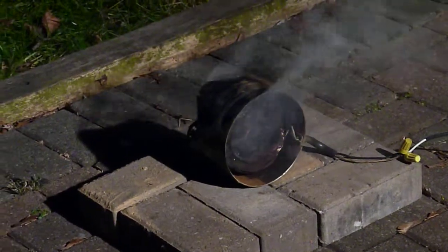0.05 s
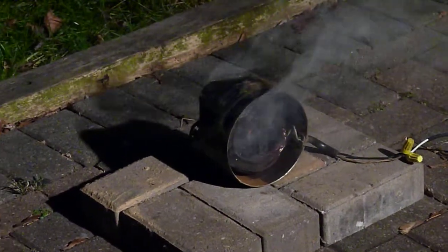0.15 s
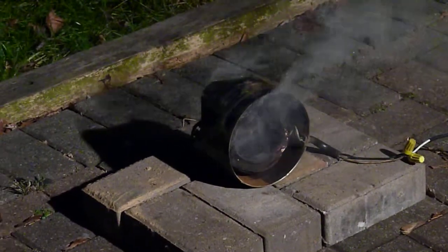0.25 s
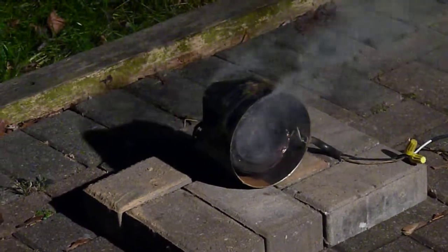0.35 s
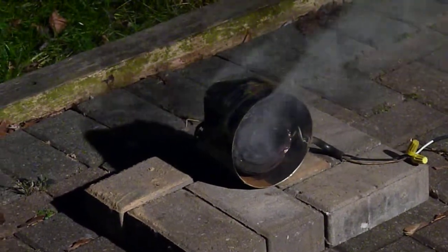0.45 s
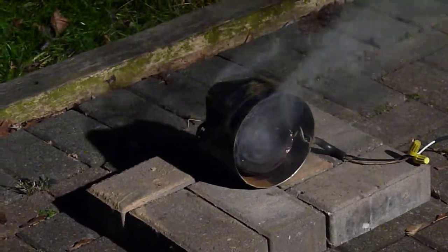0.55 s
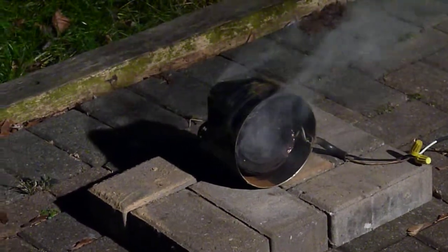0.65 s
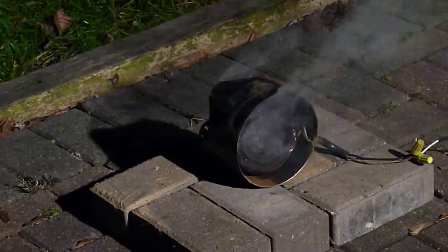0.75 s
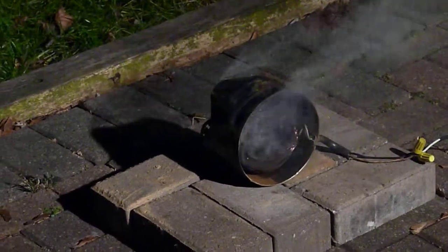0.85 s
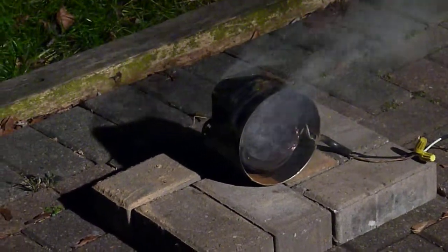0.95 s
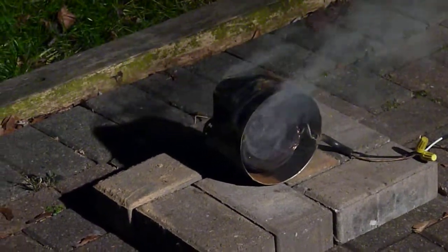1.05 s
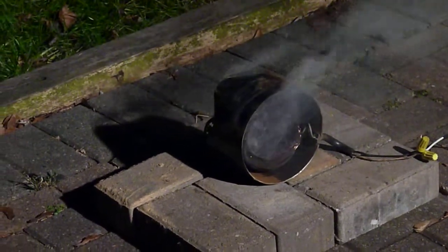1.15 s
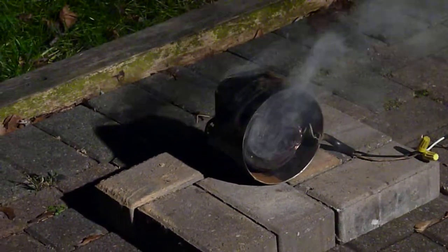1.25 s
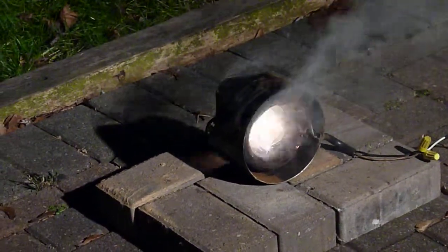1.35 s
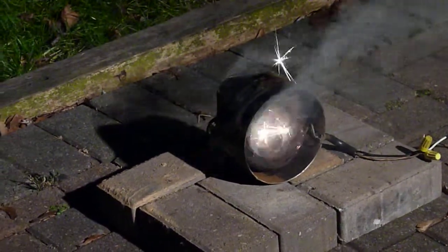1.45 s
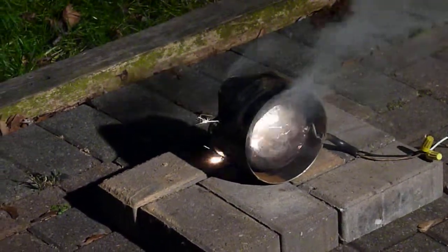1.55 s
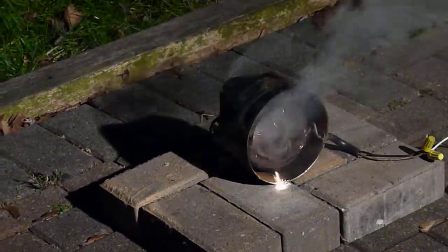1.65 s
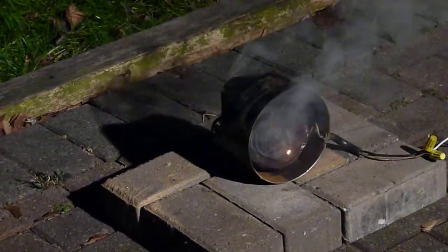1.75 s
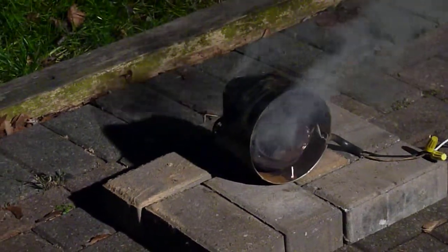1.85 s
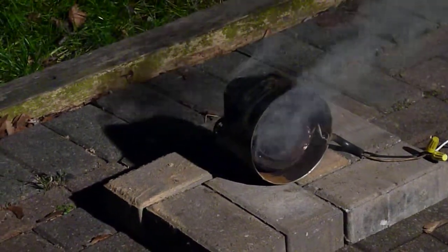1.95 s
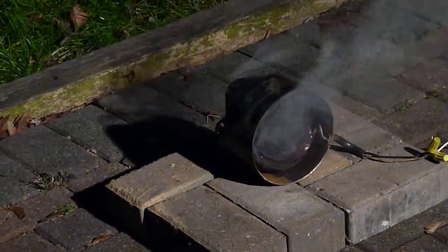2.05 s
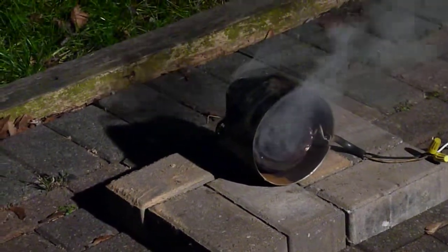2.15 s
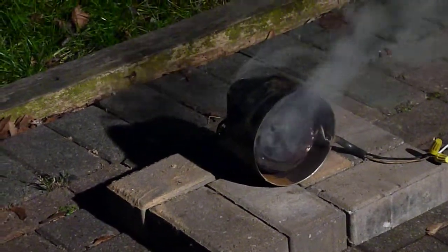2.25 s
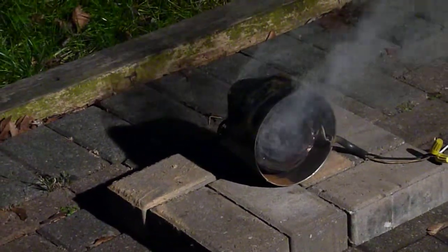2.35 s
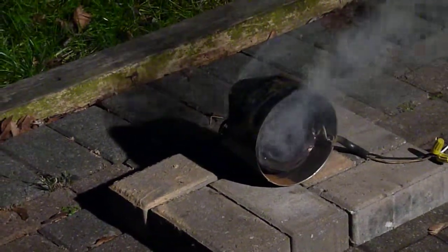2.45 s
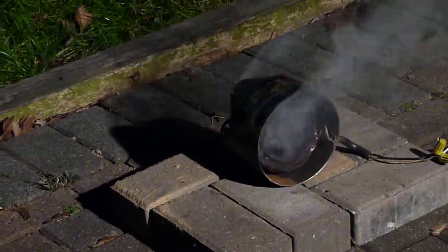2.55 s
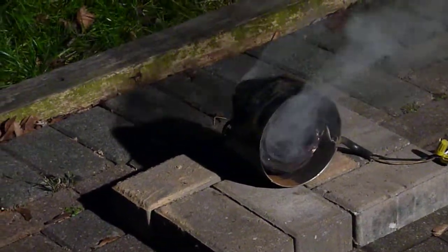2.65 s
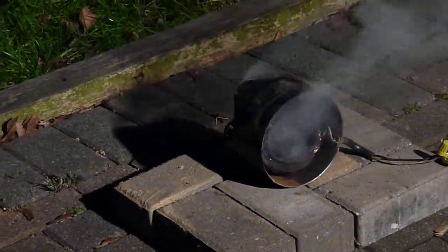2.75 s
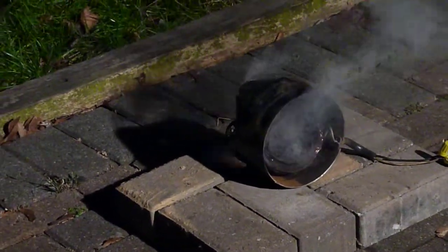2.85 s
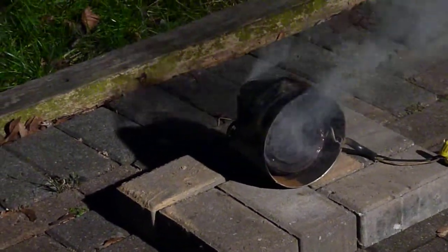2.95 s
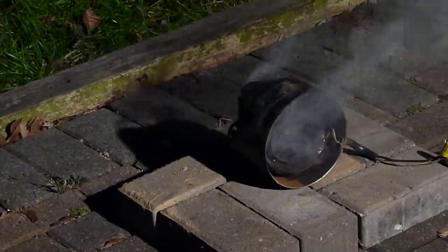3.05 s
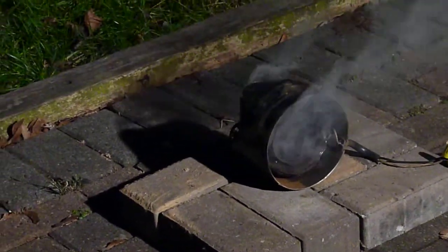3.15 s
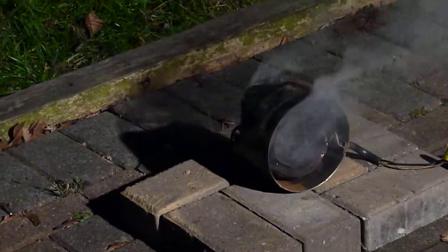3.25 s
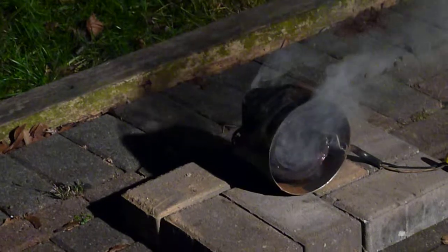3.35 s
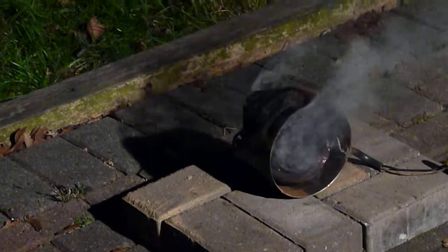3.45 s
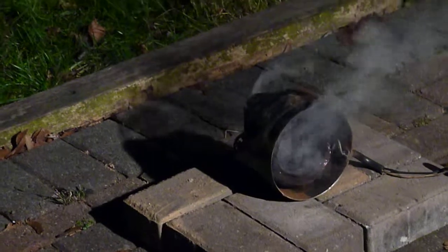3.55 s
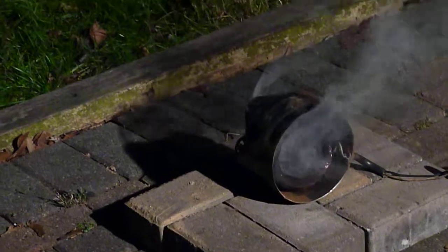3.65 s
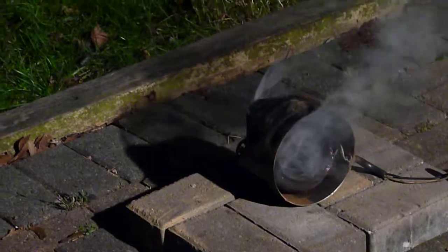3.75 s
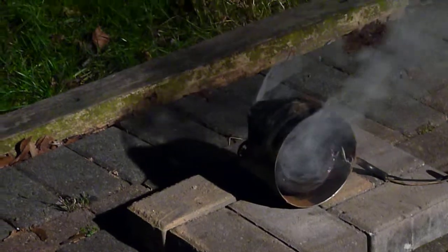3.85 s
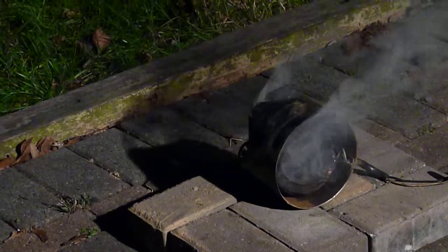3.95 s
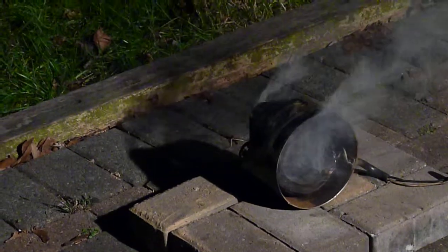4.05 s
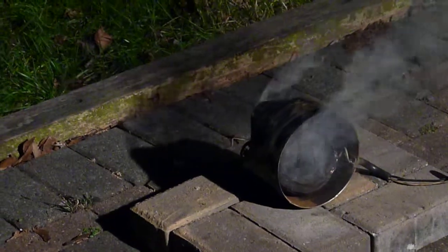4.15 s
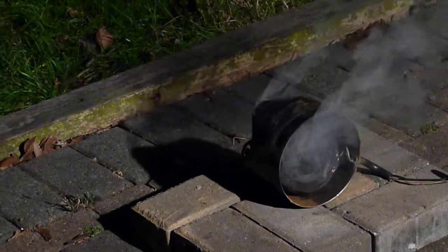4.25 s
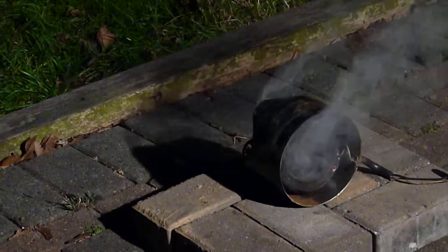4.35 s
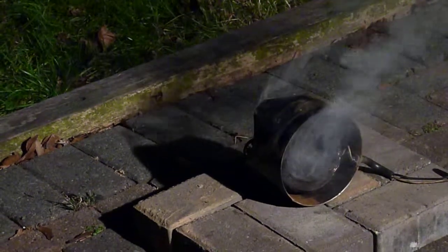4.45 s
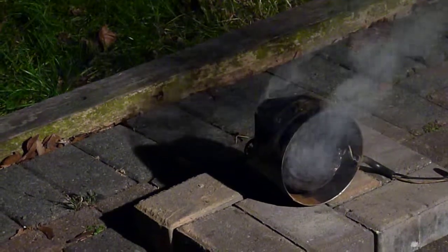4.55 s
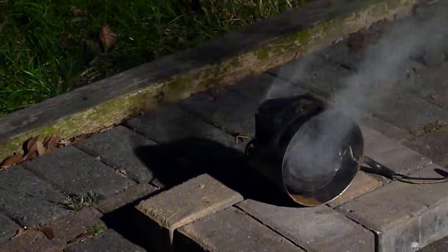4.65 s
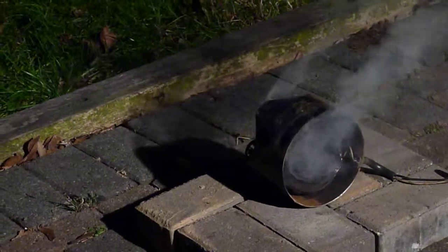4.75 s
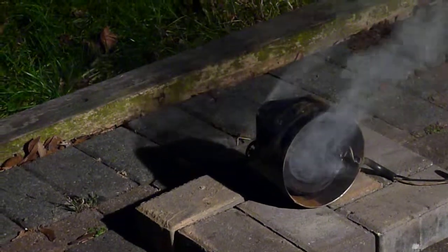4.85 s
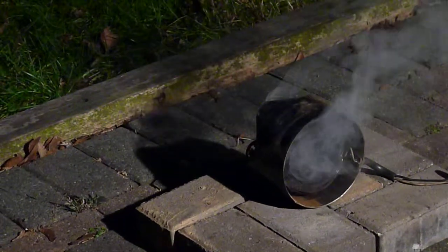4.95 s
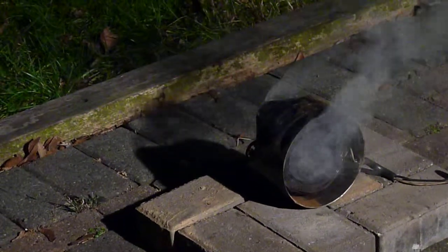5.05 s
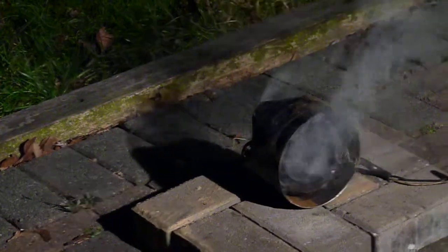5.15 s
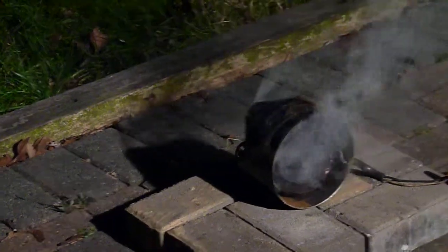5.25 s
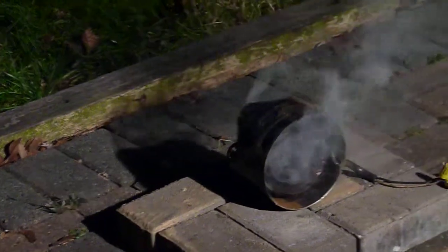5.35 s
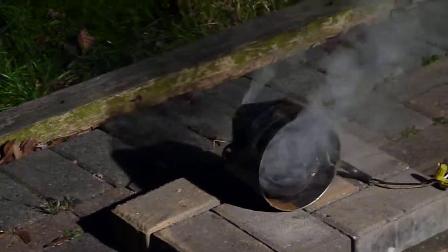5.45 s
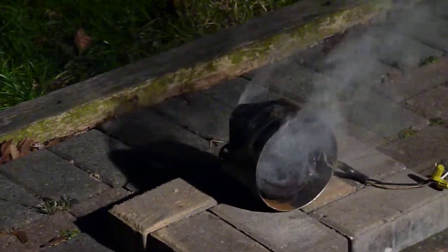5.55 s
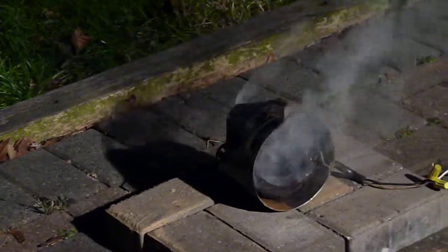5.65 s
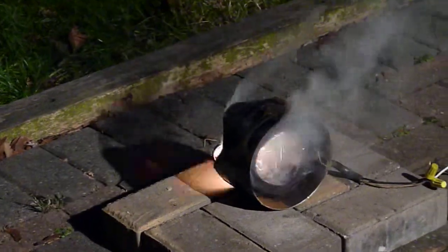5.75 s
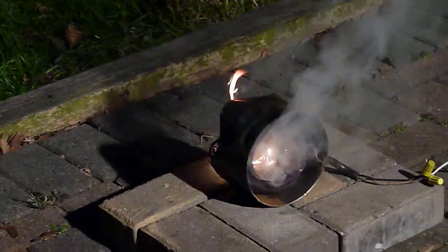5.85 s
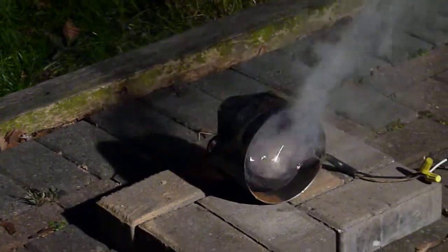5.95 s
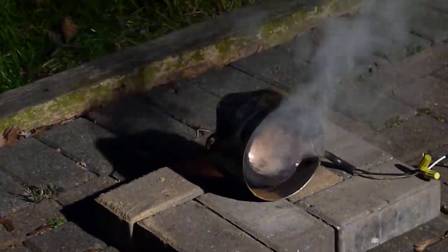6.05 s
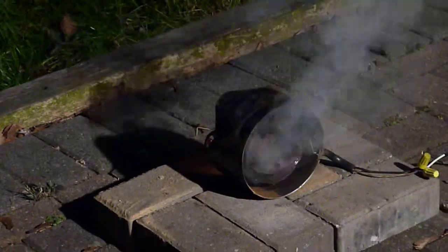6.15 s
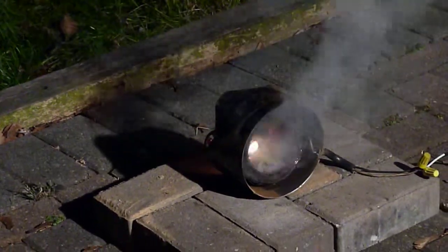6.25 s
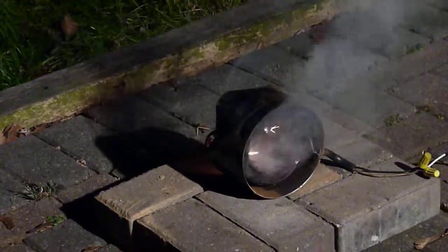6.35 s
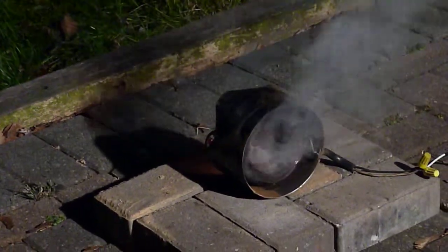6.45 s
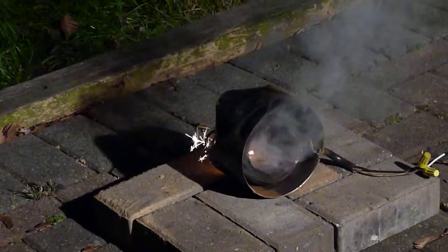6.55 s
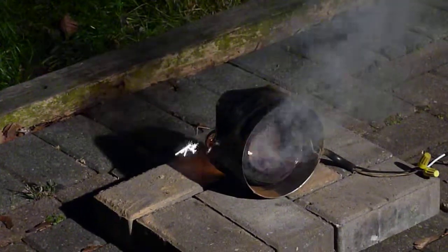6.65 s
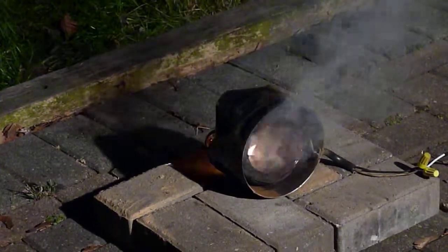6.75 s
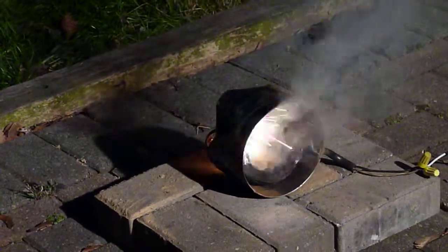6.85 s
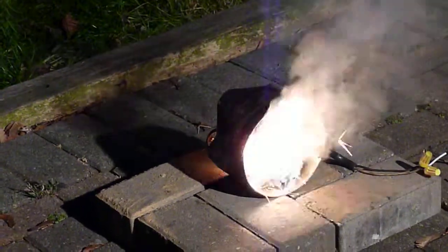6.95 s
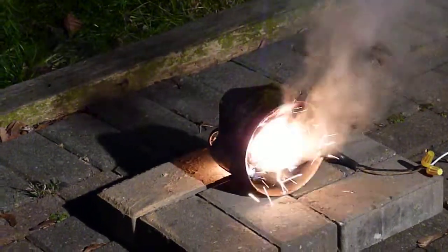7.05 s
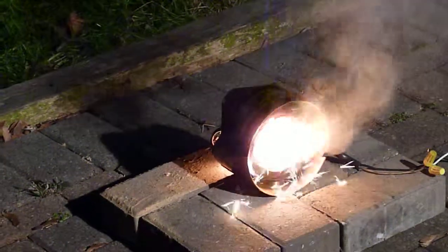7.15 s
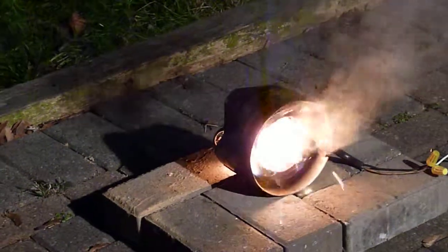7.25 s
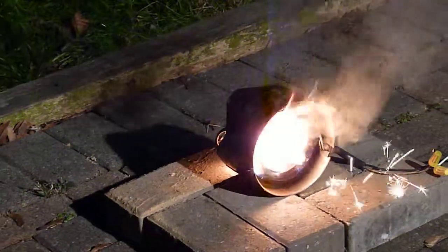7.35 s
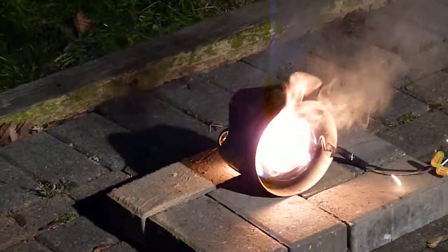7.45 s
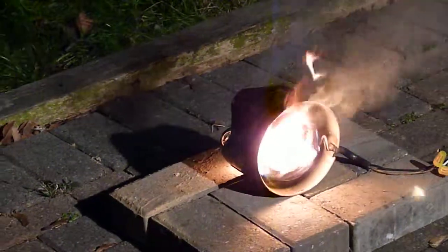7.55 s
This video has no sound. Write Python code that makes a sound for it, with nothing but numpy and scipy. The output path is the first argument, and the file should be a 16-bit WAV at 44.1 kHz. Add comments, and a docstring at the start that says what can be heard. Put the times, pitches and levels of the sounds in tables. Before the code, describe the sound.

A stalled electric motor buzzes steadily on outdoor paving, with a faint sizzle and small ticks. Sparks snap inside and make the buzz falter, and about three seconds in it stops. Scattered sharp snaps and faint pops follow, the loudest with a brief metallic ring. Near the end a short electrical crackle gives way to a soft sizzling flame and a thin buzz. Distant traffic washes underneath, with light microphone hiss.

```python
"""Over a wash of distant traffic, a stalled mains motor buzzes on paving outdoors: magnetic force jolts its
iron twice a cycle, while the overheating windings sizzle and their varnish boils. From 1 s, sparks snap
inside and shorts make the buzz sag; at 2.9 s a winding burns through and the buzz stops. More sparks
follow, the loudest with coloured echoes, among faint pops. At 6.9 s an arc crackles on the crests of the
mains, then leaves a sizzling flame and a thin buzz."""
import sys
import numpy as np
from scipy import signal
from scipy.fft import rfft, irfft
from scipy.io import wavfile
from scipy.ndimage import uniform_filter1d

SR = 44100
rng = np.random.default_rng(int(sys.argv[2]) if len(sys.argv) > 2 else 0)


def store_pcm(level_fs):
    """Save levels as 16-bit WAV."""
    pcm = np.round(np.clip(level_fs, -1, 1) * 32767).astype(np.int16)
    wavfile.write(sys.argv[1], SR, np.atleast_2d(pcm).T)


N = 335601
TIME = np.arange(N) / SR
MAINS_HZ, CREST_S = 60.015, 6.96  # mains frequency and the moment of one crest
SHORT_S, BURN_THROUGH_S, ARC_ON_S, ARC_OFF_S = 1.42, 2.904, 6.9, 7.012
SIZZLE_RELEASE_S = 0.05

# Spectrum of the distant traffic (frequency [Hz], relative level [dB])
TRAFFIC_SPECTRUM = [(25, -52), (60, -32.5), (100, -21), (200, -6.5), (340, -2), (490, -6.5), (800, 4),
                    (1200, -1.5), (1800, -8.5), (2250, -13.5), (2900, -22.5), (4200, -33.5), (6000, -66.5)]
# Likeness of the traffic at left and right (frequency [Hz], correlation [ratio])
TRAFFIC_COHERENCE = [(100, 1), (500, 0.99), (1000, 0.97), (2000, 0.75), (4000, 0.21), (8000, .3)]
# Swells of tyre hiss (centre [s], half length [s], gain [dB])
TYRE_PASSES = [(2.606, 2.33, 6), (5.52, 0.37, 3.5)]
# Course of the traffic's low rumble (time [s], gain [dB])
RUMBLE_CURVE = [(3.6, -1), (4.2, 2), (4.9, 0.5), (5.3, -2), (6.4, -3), (7.3, -1)]
# Harmonics of the warm frame (order [multiple of twice the mains], relative level [dB])
WARM_HARMONICS = [(1, -36.5), (2, -10), (3, -1), (4, -39), (5, 1), (6, 5), (7, -9), (8, 7), (9, -2),
                  (10, 5.5), (11, 0), (12, -7), (13, -8), (14, -33.5), (15, -13.5), (16, -26.5),
                  (17, -10.5), (18, -17), (19, -1.5), (20, -9.5)]
# Harmonics of the hot frame (order [multiple of twice the mains], relative level [dB])
HOT_HARMONICS = [(1, -30.5), (2, -9), (3, -4.5), (4, -12.5), (5, -8.5), (6, 1.5), (7, -1), (8, -13.5),
                 (9, -0.5), (10, 4), (11, 0.1), (12, -7), (13, -6.5), (14, -11), (15, -10.5), (16, -25.5),
                 (17, -14), (18, -7), (19, -4), (20, -8.5)]
# Thin top of the buzz, from loose laminations (frequency [Hz], relative level [dB])
LAMINATION_SPECTRUM = [(2520, -36.5), (2640, -14.5), (2760, -33), (2880, -20.5), (3000, -20), (3240, -35.5),
                       (3400, -23), (3700, -59.5), (3960, -27.5), (4400, -40), (4900, -25.5), (5600, -48),
                       (6000, -26), (7000, -64.5)]
# Two bands in which loose parts rattle (centre [Hz], width [Hz])
LOOSE_PART_BANDS = [(2350, 240), (3000, 600)]
# Course of the lower rattle band (time [s], gain [dB])
LOW_RATTLE_CURVE = [(0, -6), (.15, -9.5), (.3, -2), (.65, -4), (.8, 0), (1, -1.5), (1.1, -6), (1.25, -2),
                    (1.75, -9), (1.95, -12), (2.1, -22), (2.18, -0.5), (2.78, 0.5), (2.88, -7)]
# Course of the upper rattle band (time [s], gain [dB])
HIGH_RATTLE_CURVE = [(.24, -15), (.35, 1), (.5, 1.5), (1.001, -1.5), (1.24, 3), (1.5, -13), (2.1, -1),
                     (2.6, 1.5), (2.9, -2)]
# Sags of the current (start [s], end [s], mean treble gain [dB])
CURRENT_SAGS = [(1.03, 1.065, -30), (1.356, 1.44, -19), (1.576, 1.65, -5.5)]
# Spectrum of sizzling smoke and flame (frequency [Hz], relative level [dB])
SIZZLE_SPECTRUM = [(500, -23.5), (2800, -7), (3500, -2), (4200, -0.5), (5000, 1), (5800, -2), (7300, -0.5),
                   (9000, -29)]
# Loudest bursting blisters of varnish (time [s], level [dB], ring frequency [Hz])
BLISTERS = [(0.3366, -51, 4870), (0.395, -52.5, 5000), (1.2695, -50, 4950), (1.7852, -52, 5010),
            (1.9106, -56.5, 5200), (2.0783, -51, 4930), (2.1362, -54, 4960), (2.1525, -58, 4950),
            (2.2638, -51, 5200), (2.3218, -50, 4900), (2.412, -54, 5010), (2.494, -51, 4970),
            (2.5738, -49, 4910), (2.691, -52.5, 4810), (2.8018, -52, 4830), (2.8193, -51, 4820),
            (2.9792, -61, 4840), (3.043, -62, 5000), (3.0942, -50, 5100), (3.145, -49.5, 4940),
            (3.1705, -62, 4920), (3.2028, -58, 5050), (3.2438, -60, 4900), (3.4043, -54, 4920)]
# Spectrum of boiling varnish (frequency [Hz], relative level [dB])
VARNISH_SPECTRUM = [(500, -24), (3300, -22.5), (4300, 1), (5000, 4.5), (5450, -0.5), (5950, -14),
                    (9000, -34)]
# Sparks (time [s], level [dB], length [s], treble tilt [dB/octave], pop re crack [dB],
# ring frequency [Hz], ring re crack [dB])
FLASHOVERS = [(1.046, -52, 0.0048, -2, -10, 7000, -14), (1.349, -42.5, 0.0049, -4, -16, 4800, -8),
              (1.389, -55, 0.0019, 3, 7, 5000, -5), (1.4, -38.5, 0.0041, -3.5, 2, 5000, -8),
              (1.593, -46, .005, -6, -17, 4300, -4), (1.5994, -30, 0.0042, 3.5, -2, 4070, -10),
              (2.899, -43, 0.0054, 8, 4, 5700, -4), (3.901, -55, 0.0027, -5, -4, 3530, -10),
              (4.0979, -31, 0.0018, -10.5, -10, 4820, 2), (4.295, -48.5, 0.0023, -4, -1, 3920, -11.5),
              (4.586, -61, .003, -1, -13, 5900, -9), (5.127, -58.5, .002, -4, -18, 4000, -7),
              (5.29, -60, .002, -5, -16, 5000, -4), (5.616, -54.5, 0.0067, 6, 1, 3360, -6),
              (5.625, -54.5, 0.01, -5, -10, 5600, -8), (5.646, -59, .007, 1, -12, 5600, -9),
              (5.726, -59, 0.0025, 2, -14, 5650, -4), (5.743, -59, .003, -3, -12, 5000, -6),
              (5.7838, -36, 0.0044, -2, 3.5, 4840, -2), (5.832, -38.5, 0.0035, 3.5, -0.5, 5640, -8),
              (5.868, -41, 0.0023, -3, -2, 6260, -9), (6.011, -53.5, 0.0015, 4, -19, 4070, -1),
              (6.184, -44, 0.0022, 1, 3, 7200, -12), (6.379, -42.5, 0.0061, 0, -21, 5700, -11),
              (6.531, -58, 0.0018, 7, 2, 6900, 3), (6.587, -57, .003, -5, -16, 5700, -12),
              (6.599, -44.5, 0.0041, -1, -16, 6830, -11), (6.737, -57, 0.0024, -6, -14, 6400, -6),
              (6.76, -63, .002, 10, -18, 7300, -6), (6.909, -38.5, 0.0022, -12, -22, 2050, 3),
              (7.145, -55, 0.0034, 1, -15, 6600, -8), (7.359, -55, 0.0027, 1, -15, 7000, -8),
              (7.177, -52, 0.0036, -6, -11, 6930, -8), (7.2295, -55, 0.0027, -6, -14, 3150, -6),
              (7.282, -53.5, 0.0024, -7, -13, 3430, -2), (7.408, -56, .003, 0, -14, 3550, -11)]
# Spectrum of a spark's crack (frequency [Hz], relative level [dB])
CRACK_SPECTRUM = [(100, -40.5), (900, -26.5), (2000, 3.5), (3000, 3.5), (3600, 1.5), (4150, 8.5),
                  (5000, 11), (6150, 6), (6550, 4.5), (7000, 10), (7600, 3), (9000, -19.5)]
# Spectrum of a spark's low pop (frequency [Hz], relative level [dB])
POP_SPECTRUM = [(40, -38.5), (100, -22), (300, 0.5), (550, -4), (800, 6), (1080, 10), (1330, 2),
                (1700, -4.5), (2400, 4.5), (5000, -50)]
# Spectrum of the fizz after a spark (frequency [Hz], relative level [dB])
SPUTTER_SPECTRUM = [(900, -25.5), (2000, -3), (2900, 9.5), (3500, 4.5), (4200, 7), (5000, -1), (5800, 2.5),
                    (7000, 2.5), (7600, -1), (9000, -27.5)]
# Pitches of the tiniest random pings (frequency [Hz])
TINY_PING_HZ = [4800, 5600, 5680]
# Short pitched rings: coloured echoes just after the loud sparks, plus a few faint separate pops
# (time [s], level [dB], ring frequency [Hz])
PITCHED_RINGS = [(4.097, -45, 3140), (4.1065, -46, 3680), (4.117, -48, 5000), (4.123, -51, 3830),
                 (4.487, -65, 5580), (4.728, -65, 5600), (5.4605, -59, 5560), (5.793, -44, 3440),
                 (5.809, -47, 5000), (5.8105, -47, 3650), (5.85, -53, 3500), (5.876, -51, 3480),
                 (5.893, -55, 3750), (6.127, -63, 5600), (6.209, -61, 5800), (6.3702, -55, 5600),
                 (6.4288, -59, 5540), (6.5845, -58, 5500), (6.624, -55, 5100)]
# Spectrum of the arc's crackle (frequency [Hz], relative level [dB])
ARC_SPECTRUM = [(200, -30), (1400, -8), (2050, 11), (2450, 9), (2900, 9), (3400, 7.5), (4100, 6.5),
                (4600, -1), (5400, 5.5), (7200, 2), (9000, -24)]
# Spectrum of the arc's puff of gas (frequency [Hz], relative level [dB])
PUFF_SPECTRUM = [(50, -49), (150, -15), (270, 10), (500, 0), (1000, 4), (1500, -19), (2200, -26),
                 (4000, -35)]
# Buzz of the current through the flame (frequency [Hz], relative level [dB])
FLAME_BUZZ_SPECTRUM = [(120, -30.5), (240, 1.5), (360, 3.5), (480, -1), (620, -0.5), (1100, -14.5),
                       (1450, -10), (2200, -3.5), (2800, -11.5), (4000, -21), (6000, -21), (9000, -42)]
# Reflections off the kerb and walls (delay [s], gain [dB])
REFLECTIONS = [(0.0113, -17), (0.018, -23), (.0262, -14)]
# Self-noise of the microphone (frequency [Hz], relative level [dB])
MIC_HISS_SPECTRUM = [(100, -28), (2000, 4.5), (3500, 9), (5000, 7.5), (7300, 6.5), (9000, -20)]
# Balance of the microphone's two ports (frequency [Hz], left minus right [dB])
PORT_BALANCE = [(350, 0), (1000, -1.3), (1700, -2.5), (2900, -1.5), (5000, -3), (8400, -6)]
# Phase between the ports (frequency [Hz], lead of the left [rad])
PORT_LEAD = [(1200, 0), (2100, 0.19), (3200, 0.87), (4100, 0.54), (5500, 0.39), (6200, -1.2), (7500, 1),
             (8800, 0.57)]
# Notches in the microphone's response (centre [Hz], width [Hz])
MIC_NOTCHES = [(2600, 850), (4600, 830), (5430, 220), (7900, 66), (8080, 92)]


def gain_of(db):
    """Amplitude ratio of a level in decibels."""
    return 10 ** (np.asarray(db) / 20)


def unit_rms(x):
    """Normalisation to rms 1."""
    return x / np.sqrt(np.mean(x ** 2) + 1e-20)


def curve_at(points, hz):
    """Linear interpolation in log frequency."""
    f, value = np.transpose(points)
    return np.interp(np.log(hz + 1), np.log(f + 1), value)


def add(mix, s, sound):
    """Superposition of a sound on the mix, from time s."""
    part = mix[round(s * SR):][:len(sound)]
    part += sound[:len(part)]


def since(s):
    """Seconds elapsed since time s; zero before it."""
    return np.maximum(TIME - s, 0)


def swell(s, length_s):
    """Linear rise from 0 to 1, from time s."""
    return np.minimum(since(s) / length_s, 1)


def release(s, decay_s):
    """Exponential decay from time s; 1 before it."""
    return np.exp(-since(s) / decay_s)


def colour(x, spectrum, tilt_db=0, size=4096):
    """Minimum-phase filtering by a response of unit energy, tilted per octave from 3 to 9 kHz."""
    hz = abs(np.fft.fftfreq(size, 1 / SR))
    octaves = np.log2(np.clip(hz, 3000, 9000) / 3000)
    log_gain = np.log(gain_of(curve_at(spectrum, hz) + tilt_db * octaves))
    response = np.fft.ifft(np.exp(np.conj(signal.hilbert(log_gain)))).real[:size // 2]
    return signal.fftconvolve(x, response / np.linalg.norm(response))[:N]


def treble(x, hz):
    """Zero-phase high-pass filtering."""
    f = np.fft.rfftfreq(N, 1 / SR)
    return irfft(rfft(x) * (1 - 1 / (1 + (f / hz) ** 8)), N)


def band(x, hz, width_hz):
    """Zero-phase band-pass filtering."""
    f = np.fft.rfftfreq(N, 1 / SR)
    return irfft(rfft(x) / (1 + (2 * (f - hz) / width_hz) ** 8), N)


def traffic(level_db=-45.5, drone_hz=150.4, drone_db=-69.5):
    """Far traffic sums to partly coherent noise, with swells of tyre hiss and a narrow-band drone."""
    hz = np.fft.rfftfreq(N, 1 / SR)
    left, independent, drone = rfft(rng.standard_normal((3, N)))
    coherence = curve_at(TRAFFIC_COHERENCE, hz)
    right = coherence * left + np.sqrt(1 - coherence ** 2) * independent
    roar = unit_rms(irfft(np.array([left, right]) * gain_of(curve_at(TRAFFIC_SPECTRUM, hz)), N))
    tyres_db = -2 + sum(db * np.exp(-((TIME - s) / half_s) ** 2) for s, half_s, db in TYRE_PASSES)
    roar += (gain_of(tyres_db) - 1) * treble(roar, 1450)
    rumble_db = np.interp(TIME, *np.transpose(RUMBLE_CURVE))
    roar += (gain_of(rumble_db) - 1) * band(roar, 240, 160)
    drone = unit_rms(irfft(drone / (1 + ((hz - drone_hz) / 5) ** 2), N))
    swell_db = 1.4 * np.exp(-((TIME - 4.96) / 0.16) ** 2)
    return gain_of(level_db + swell_db) * roar + gain_of(drone_db) * drone


def strain_s():
    """Strain accumulates in the windings with time: anew when turns short, no further once one breaks."""
    return np.minimum(TIME, BURN_THROUGH_S) - SHORT_S * (TIME > SHORT_S)


def magnetic_jolts(lag_turns, jitter_db):
    """Magnetic force peaks in every half cycle of the mains: a slightly uneven pulse train."""
    turns = 2 * MAINS_HZ * (TIME - CREST_S) - lag_turns
    nearest = np.round(turns).astype(int)
    strength = gain_of(jitter_db * rng.standard_normal(np.ptp(nearest) + 1))[nearest - nearest[0]]
    samples_away = (turns - nearest) * SR / (2 * MAINS_HZ)
    return unit_rms(strength * np.sinc(samples_away / 2) * np.exp(-(samples_away / 16) ** 2))


def dispersion(x, treble_lead_s=0.0008, above_hz=1850):
    """Bending waves in the steel frame run faster at high frequency, so the treble arrives first."""
    hz = np.fft.rfftfreq(N, 1 / SR)
    lead_s = treble_lead_s * (1 - 1 / (1 + (hz / above_hz) ** 12))
    return irfft(rfft(x) * np.exp(2j * np.pi * np.cumsum(lead_s) * SR / N), N)


def current_sags(x, onset_s=0.0042, recovery_s=0.005, flutter_depth=0.42, bass_share=0.43):
    """Amplitude modulation: shorts make the buzz sag and flutter, the treble more than the bass."""
    sag_db = np.zeros(N)
    for start, end, db in CURRENT_SAGS:
        ramp = np.minimum((TIME - start) / onset_s, (end - TIME) / recovery_s)
        sag_db += db * np.clip(ramp + 0.5, 0, 1)
    flutter = unit_rms(uniform_filter1d(rng.standard_normal(N), size=370))
    sag_db *= 1 + flutter_depth * flutter
    rasp = treble(x, 970)
    return gain_of(sag_db) * rasp + gain_of(bass_share * sag_db) * (x - rasp)


def motor_buzz():
    """Forced vibration: magnetic jolts ring the frame and rattle loose parts until a winding breaks."""
    heat = 1 - 0.55 * release(SHORT_S, decay_s=0.13)
    drive_db = -42.5 + 0.95 * strain_s() - 1.6 * heat  # the hot frame buzzes more softly
    jolts = magnetic_jolts(lag_turns=0.47, jitter_db=0.35) * gain_of(drive_db) * (TIME < BURN_THROUGH_S)
    warm, hot = (colour(jolts, [(2 * MAINS_HZ * k, db) for k, db in harmonics] + LAMINATION_SPECTRUM)
                 for harmonics in (WARM_HARMONICS, HOT_HARMONICS))
    frame = (1 - heat) * warm + heat * hot
    rattle_db = -4 + 4.5 * strain_s()
    frame += (gain_of(rattle_db) - 1) * treble(frame, 3100)
    for (hz, width_hz), curve in zip(LOOSE_PART_BANDS, (LOW_RATTLE_CURVE, HIGH_RATTLE_CURVE)):
        band_db = np.interp(TIME, *np.transpose(curve))
        frame += (gain_of(band_db) - 1) * band(frame, hz, width_hz)
    return current_sags(dispersion(frame))


def grains(per_s, spread_db, size=N):
    """Shot noise of rms 1: tiny clicks at random moments, a few of them large."""
    strength = gain_of(spread_db * np.minimum(rng.exponential(1, size), 4))
    return unit_rms((rng.random(size) < per_s / SR) * strength * rng.choice([-1, 1], size))


def mains_gate(width, between_db, reverse_db=0):
    """Discharge peaks at each voltage crest and falls by 1/e per `width`, a share of the crest."""
    voltage = np.cos(2 * np.pi * MAINS_HZ * (TIME - CREST_S))
    crest = np.exp((abs(voltage) - 1) / width)
    return unit_rms(crest * np.where(voltage > 0, 1, gain_of(reverse_db)) + gain_of(between_db))


def surge_db():
    """Boiling grows exponentially up to the burn-through, then dies away."""
    return 5.5 * np.exp(-abs(TIME - BURN_THROUGH_S) / 0.13) * release(BURN_THROUGH_S, SIZZLE_RELEASE_S)


def sizzle(smoulder_db=-77, flame_db=-67, flare_db=-53.5):
    """Mains-modulated noise of smoke and tiny discharges: under current, smouldering, then aflame."""
    live = gain_of(-69 + 2 * strain_s() + surge_db()) * release(BURN_THROUGH_S, SIZZLE_RELEASE_S)
    flare = gain_of(flare_db) * release(ARC_OFF_S, decay_s=0.03)
    flame = (TIME > ARC_OFF_S) * (gain_of(flame_db) + flare)
    envelope = np.maximum(live + flame, gain_of(smoulder_db))
    fizz = unit_rms(rng.standard_normal(N) + grains(per_s=540, spread_db=2))
    return colour(fizz * mains_gate(width=0.17, between_db=-4.5) * envelope, SIZZLE_SPECTRUM)


def burst(length_s, spectrum, tilt_db=0, shock_s=0.0005, size=600):
    """Sudden expansion: a shock and a dying rush of gas, with the energy of rms 1 over length_s."""
    age = 4 * np.arange(size) / SR / length_s
    gas = rng.standard_normal(size) * age * np.exp(-age ** 1.03 / 1.58)
    shock = 0.45 * signal.unit_impulse(size, round(shock_s * SR))
    snap = colour(gas / np.linalg.norm(gas) + shock, spectrum, tilt_db)
    return snap / np.linalg.norm(snap) * np.sqrt(length_s * SR)


def ping(hz, decay_s, size=1200):
    """Damped resonance: a brief metallic ring of unit energy."""
    t = np.arange(size) / SR
    ring = t * np.exp(-t / decay_s) * np.sin(2 * np.pi * hz * t)
    return ring / np.linalg.norm(ring)


def boiling_varnish(tick_s=0.002, gas_db=-4, start_db=-74, rest_db=-81.5):
    """Bursting blisters excite pitched ticks, over a simmer of shot noise that follows the heat."""
    heating_db = 3 * np.minimum(TIME, BURN_THROUGH_S) - 26 * since(BURN_THROUGH_S)
    simmer_db = np.maximum(start_db + heating_db + surge_db(), rest_db)
    out = colour(grains(per_s=160, spread_db=2) * gain_of(simmer_db), VARNISH_SPECTRUM)
    for s, db, hz in BLISTERS:
        add(out, s, gain_of(db + gas_db) * burst(tick_s, VARNISH_SPECTRUM))
        add(out, s, gain_of(db) * np.sqrt(tick_s * SR) * ping(hz, decay_s=0.00049))
    return out


def sparks(leak_s=0.0059, sputter_s=0.068, pop_delay_s=0.0008, size=5000):
    """Electrical breakdown: leakage fizzes up to a crack that rings the housing, pops and sputters."""
    out = np.zeros(N)
    t = np.arange(size) / SR
    for s, db, length_s, tilt_db, pop_db, ring_hz, ring_db in FLASHOVERS:
        leak = np.exp(-t / leak_s)[::-1] * grains(per_s=2500, spread_db=2.2, size=size)
        sputter = np.exp(-t / sputter_s) * grains(per_s=840, spread_db=1.6, size=size)
        impulse = np.sqrt(length_s * SR)  # carries the same energy as the burst
        add(out, s - size / SR, gain_of(db - 21) * colour(leak, CRACK_SPECTRUM, tilt_db))
        add(out, s, gain_of(db) * burst(length_s, CRACK_SPECTRUM, tilt_db))
        add(out, s, gain_of(db + ring_db) * impulse * ping(ring_hz, decay_s=0.00088))
        add(out, s + pop_delay_s, gain_of(db + pop_db) * colour([impulse], POP_SPECTRUM))
        add(out, s, gain_of(0.66 * db - 36.5) * colour(sputter, SPUTTER_SPECTRUM, tilt_db))
    return out


def pitched_rings(from_s=3.8, ring_s=0.0018, tiny_db=-84):
    """Damped resonances: coloured echoes just after the loud sparks, faint pops and tiny random pings."""
    tiny = sum(signal.fftconvolve(grains(per_s=9, spread_db=2.5), ping(hz, ring_s))[:N]
               for hz in TINY_PING_HZ)
    out = gain_of(tiny_db) * unit_rms(tiny) * (TIME > from_s) * (TIME < ARC_ON_S)
    for s, db, hz in PITCHED_RINGS:
        add(out, s, gain_of(db) * np.sqrt(ring_s * SR) * ping(hz, ring_s))
    return out


def arc(end_db=-37, growth_db_per_s=36, puff_db=-45):
    """Partial rectification: the arc crackles and puffs hot gas at each crest, mostly in one polarity."""
    burning = (TIME > ARC_ON_S) * release(ARC_OFF_S, decay_s=0.0051)
    gate = burning * mains_gate(width=0.24, between_db=-18, reverse_db=-13)
    hiss, gas = rng.standard_normal((2, N))
    crackle = unit_rms(hiss + 0.52 * grains(per_s=4000, spread_db=2.2))
    crackle *= gain_of(end_db + growth_db_per_s * np.minimum(TIME - ARC_OFF_S, 0))
    puff = gas * gain_of(puff_db) * swell(ARC_ON_S, length_s=0.05) ** 2
    return colour(crackle * gate, ARC_SPECTRUM) + colour(puff * gate, PUFF_SPECTRUM)


def flame_buzz(drive_db=-57):
    """Forced vibration: current creeps through the burning windings and the iron buzzes again, thinly."""
    envelope = gain_of(drive_db) * np.sqrt(swell(ARC_OFF_S, length_s=0.35))
    return colour(magnetic_jolts(lag_turns=0.4, jitter_db=1.2) * envelope, FLAME_BUZZ_SPECTRUM)


def yard(x, scatter_db=-14, scatter_s=0.0012, tail_db=-16, t60_s=0.28, size=11000):
    """Multipath propagation: direct sound, treble scatter off the motor's end bell, echoes and a tail."""
    t = np.arange(size) / SR
    high_pass = signal.butter(2, 1800, "high", fs=SR)
    scatter, *tails = signal.lfilter(*high_pass, rng.standard_normal((3, size)))
    scatter *= np.exp(-t / scatter_s)
    scatter *= gain_of(scatter_db) / np.linalg.norm(scatter)
    out = []
    for port, tail in enumerate(tails):
        tail *= gain_of(-60 * t / t60_s) * (1 - np.exp(-t / 0.011))
        paths = (-1) ** port * scatter + gain_of(tail_db) * tail / np.linalg.norm(tail)
        paths[0] += 1  # direct sound
        for delay_s, db in REFLECTIONS:
            paths[round(delay_s * SR) + port] += gain_of(db)
        out.append(signal.fftconvolve(x, paths)[:N])
    return np.array(out)


def scene():
    """Superposition in the open air: the buzzing iron, the echoing sounds of burning, and far traffic."""
    buzzing = motor_buzz() + flame_buzz()
    burning = sparks() + pitched_rings() + boiling_varnish() + arc() + sizzle()
    return buzzing + yard(burning) + traffic()


def record(dry, hiss_db=-67.5, edge_hz=8850):
    """Transduction at two ports, the right brighter: self-noise, narrow notches, a steep band limit."""
    hz = np.fft.rfftfreq(N, 1 / SR)
    hiss = np.array([colour(noise, MIC_HISS_SPECTRUM) for noise in rng.standard_normal((2, N))])
    left_response = gain_of(curve_at(PORT_BALANCE, hz) / 2) * np.exp(1j * curve_at(PORT_LEAD, hz) / 2)
    x = irfft(rfft(dry) * np.array([left_response, 1 / left_response]), N) + gain_of(hiss_db) * hiss
    for notch_hz, width_hz in MIC_NOTCHES:
        x = signal.lfilter(*signal.iirnotch(notch_hz, notch_hz / width_hz, SR), x)
    low_pass = signal.firwin(255, edge_hz, window=("kaiser", 7), fs=SR)
    return signal.oaconvolve(x, low_pass[None], "same")


dry = scene()
out = record(dry)
store_pcm(out)
```